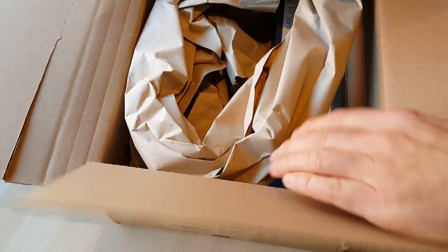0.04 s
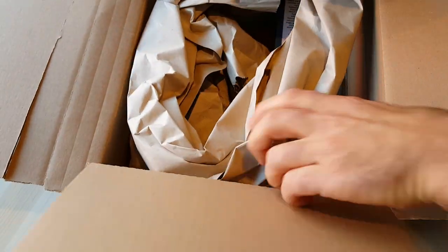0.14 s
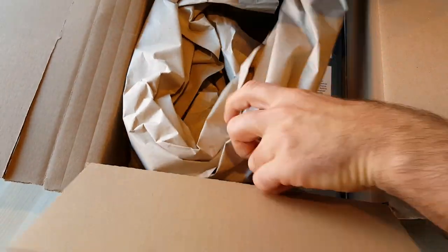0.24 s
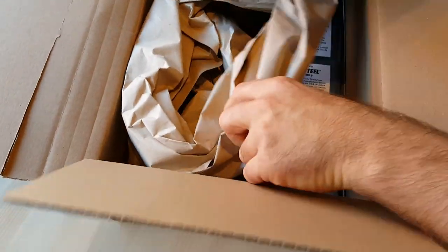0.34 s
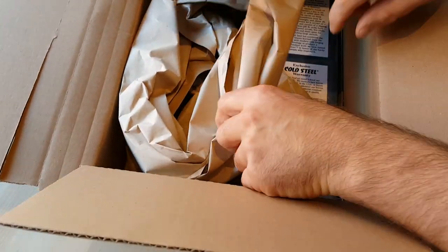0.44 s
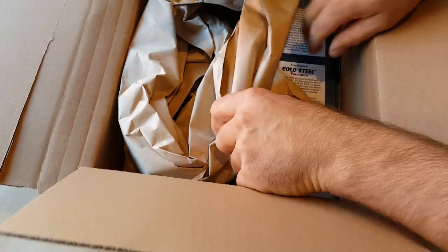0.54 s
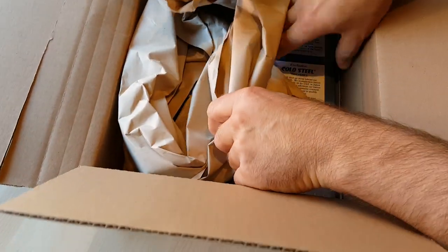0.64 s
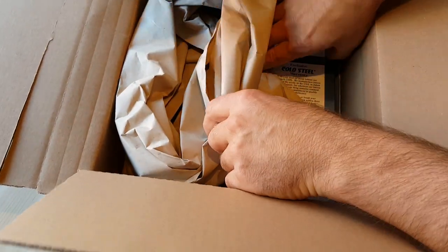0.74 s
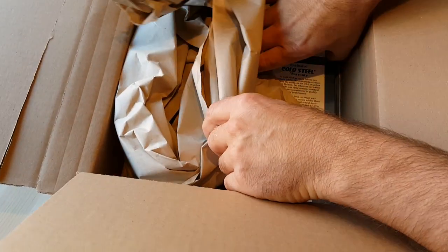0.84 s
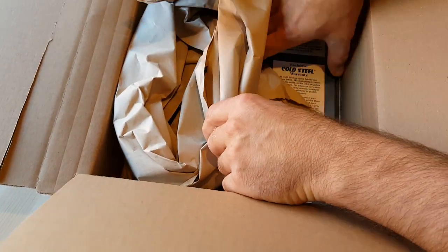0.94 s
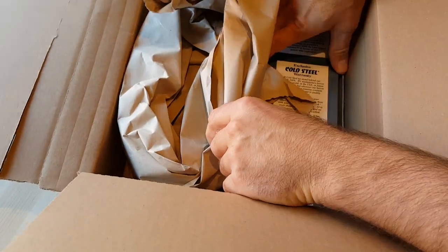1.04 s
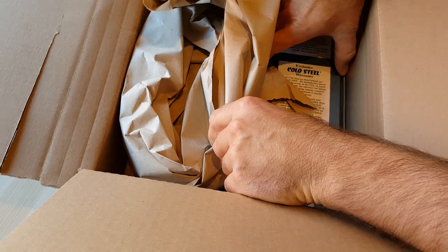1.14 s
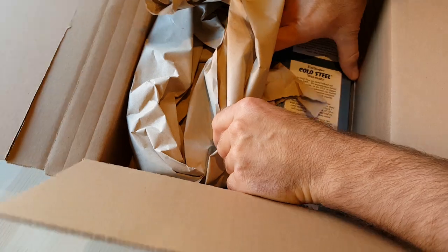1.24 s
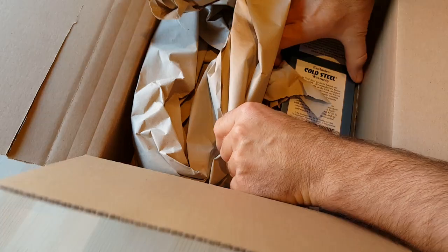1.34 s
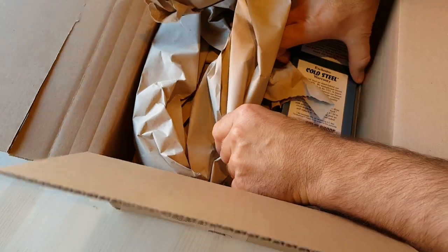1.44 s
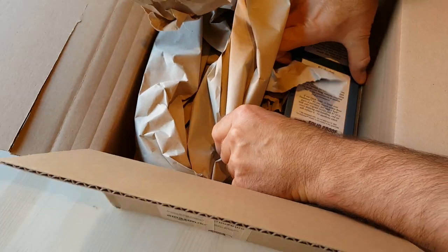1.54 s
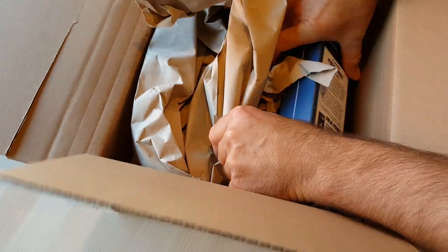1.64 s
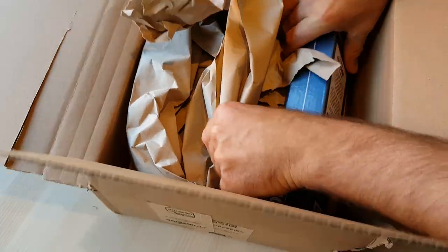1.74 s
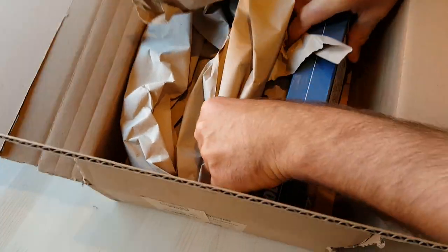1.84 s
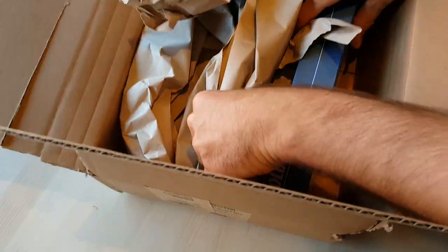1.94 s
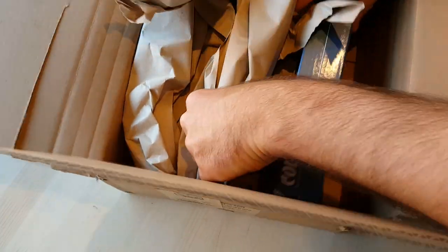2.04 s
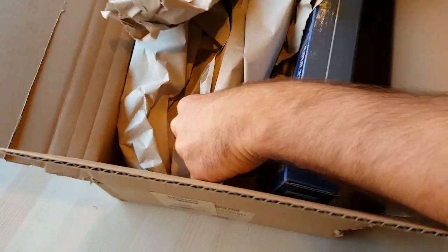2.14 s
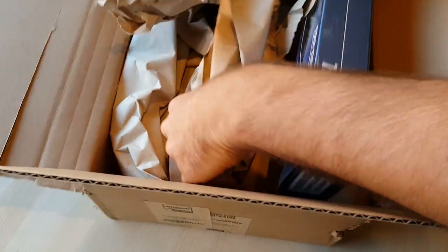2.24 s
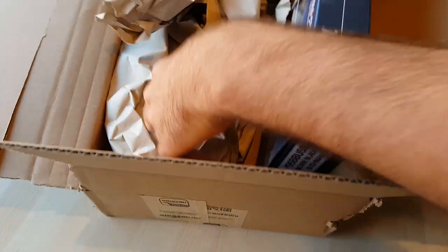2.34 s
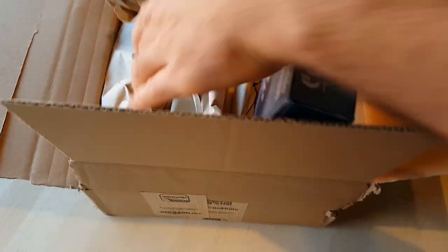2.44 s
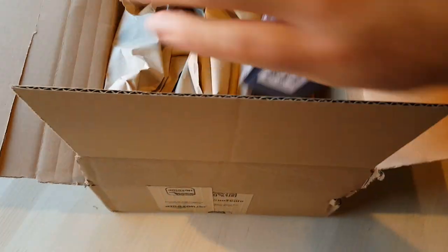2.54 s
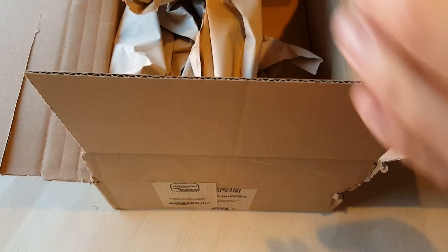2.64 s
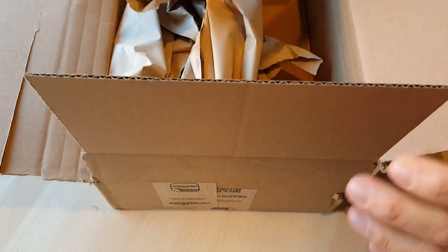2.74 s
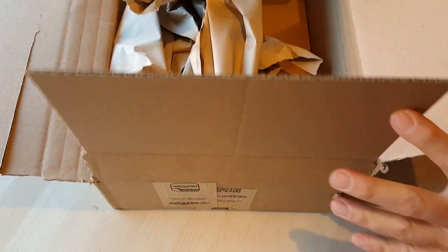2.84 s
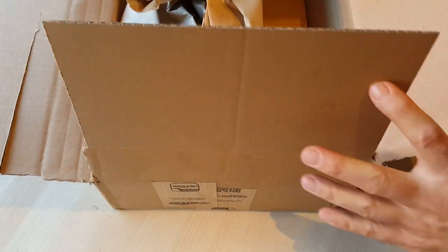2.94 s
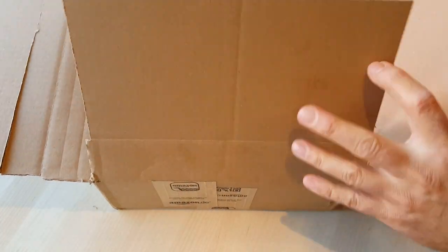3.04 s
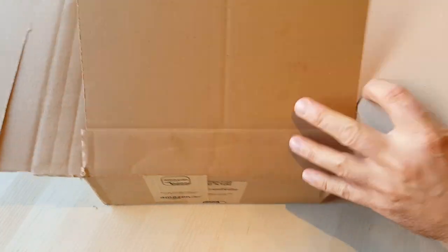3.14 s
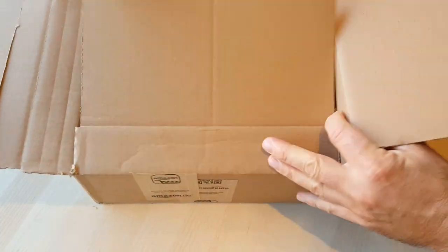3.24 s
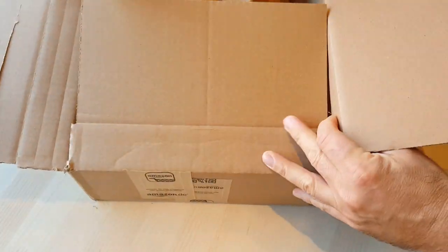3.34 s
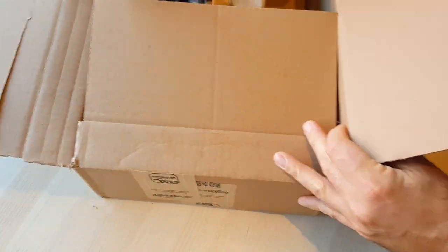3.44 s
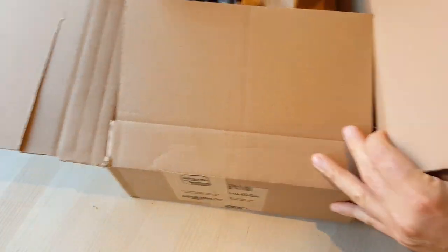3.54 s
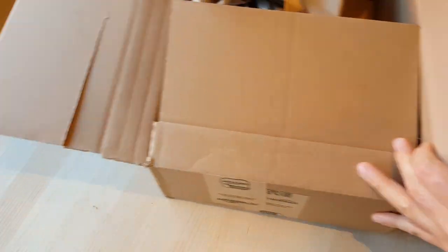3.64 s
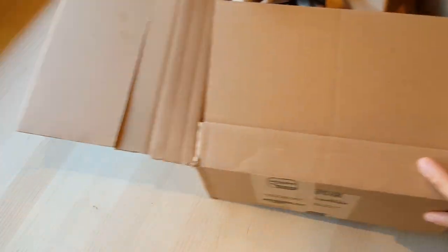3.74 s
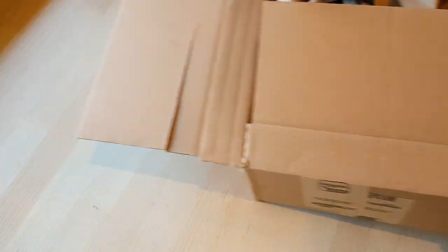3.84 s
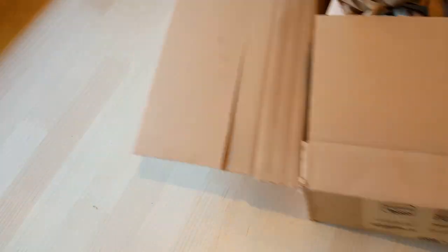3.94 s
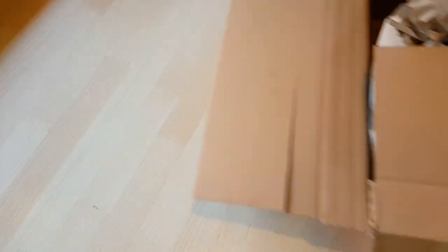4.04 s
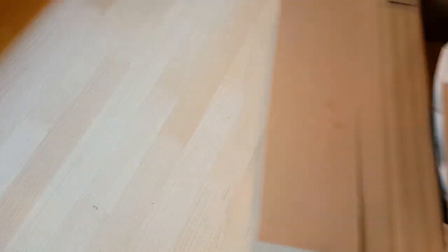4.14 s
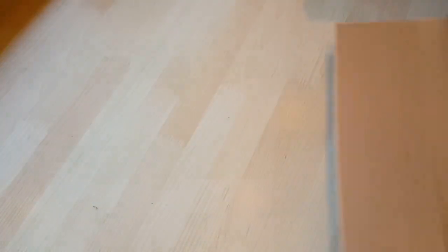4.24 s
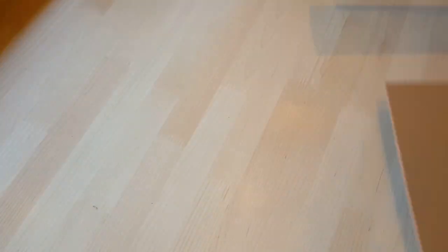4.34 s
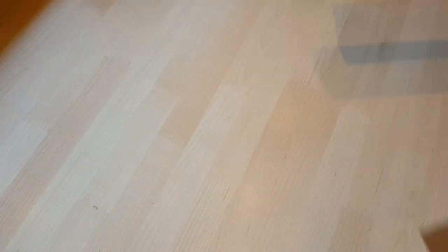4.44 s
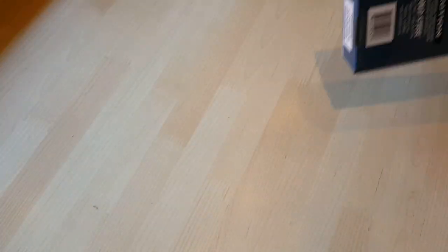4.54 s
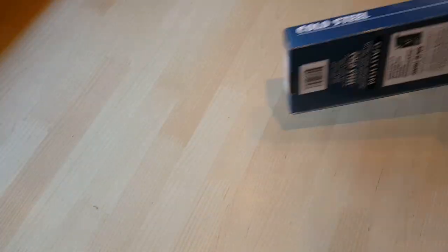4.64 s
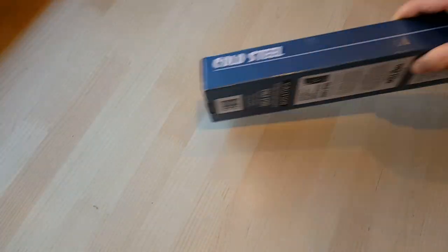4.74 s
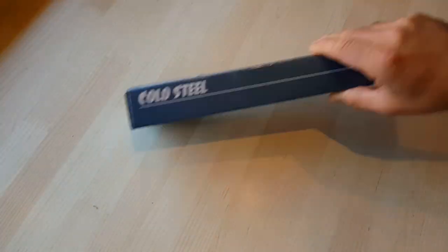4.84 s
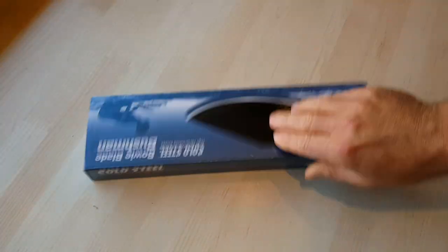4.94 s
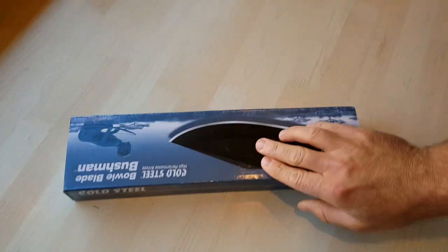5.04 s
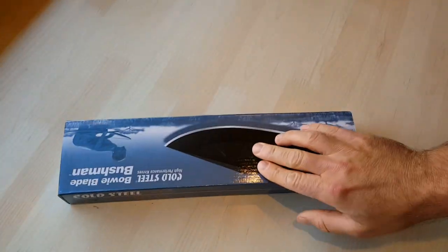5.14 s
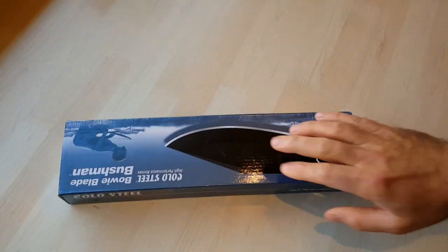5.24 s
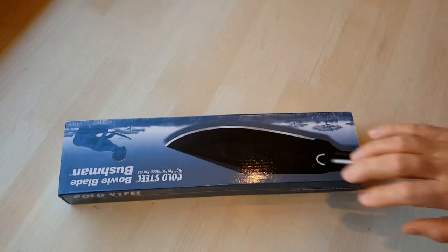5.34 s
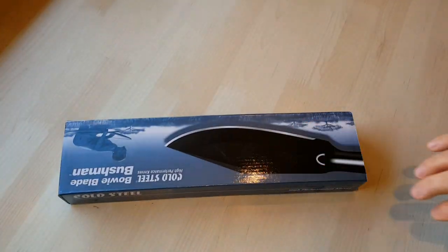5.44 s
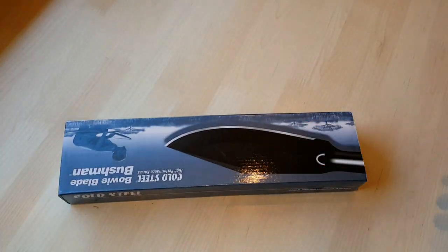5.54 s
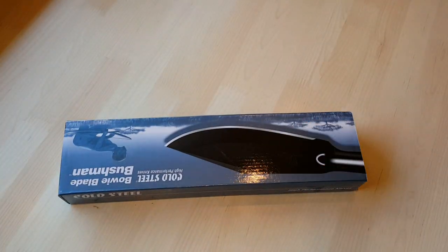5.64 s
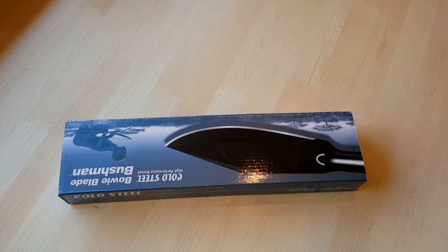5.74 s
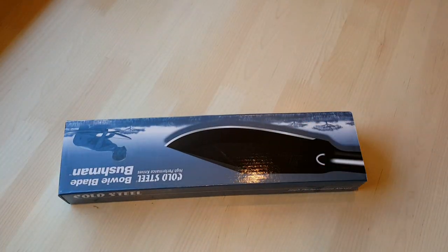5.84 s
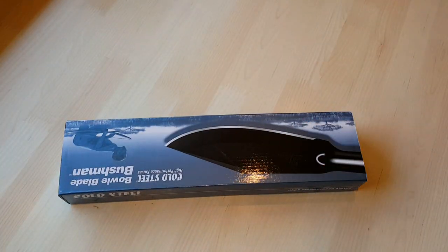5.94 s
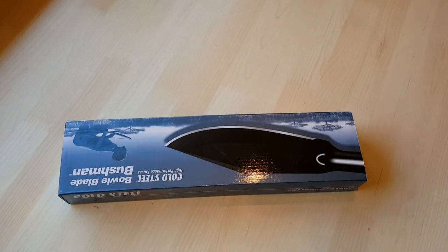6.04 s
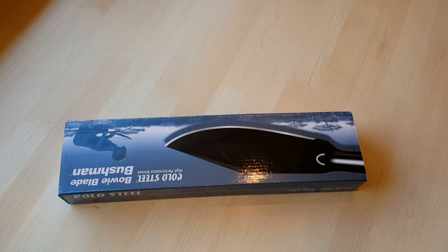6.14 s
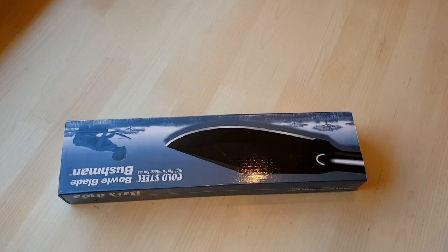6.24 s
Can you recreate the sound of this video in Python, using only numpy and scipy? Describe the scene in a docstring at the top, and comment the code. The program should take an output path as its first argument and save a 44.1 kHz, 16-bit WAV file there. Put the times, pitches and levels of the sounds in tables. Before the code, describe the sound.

A close stereo microphone in a small, quiet room with a short echo. From 0 to 2.7 seconds stiff packing paper rustles and crunches continuously, with irregular sharp snaps, strongest around 0.7, 0.9 and 2.3, and hollow low thumps on a cardboard carton, heaviest near 2.1. Around 2.5 the item judders along cardboard and gives a tiny rising squeak at 2.6; a flap clicks free at 2.8. From 2.9 to 3.5 the flap rubs dryly, with a catch and thump near 3.2. The carton slides softly, then scrapes and creaks on wood at 4.3, with dull bumps until 4.5. At 5.0 a boxed item lands with a loud woody knock, a quick slap and small bounces. Near silence follows, with faint skin brushes from 5.8, then a loud, dry cluster of jolts as the microphone stand shakes at 6.2, ringing low.

```python
"""Unpacking a boxed item

Hands dig a boxed item out of crumpled packing paper in a cardboard carton, fold back a flap and push the
carton across a wooden table; the item lands with a hard knock and the microphone stand is gripped and judders.
Rustling, rubbing and scraping are showers of tiny random clicks; snaps are short noise bursts. Blows are
fading sine waves with noise, and squeaks are sine waves of wavering pitch. All but the stand and the quiet
background noise get the echo of a small room. A close stereo microphone hears it."""
import sys
import numpy as np
from scipy import signal
from scipy.fft import rfft, irfft
from scipy.io import wavfile
from scipy.ndimage import uniform_filter1d

SR = 44100
rng = np.random.default_rng(int(sys.argv[2]) if len(sys.argv) > 2 else 0)


def transcribe(signal):
    """Save signal, clipped to [-1, 1], as a 16-bit WAV file at the path in sys.argv[1]."""
    frames = np.atleast_2d(signal).T
    limited = np.clip(frames, -1, 1)
    pcm = np.round(limited * 32767).astype(np.int16)
    wavfile.write(sys.argv[1], SR, pcm)


N = 276507
TIME = np.arange(N) / SR
RING = TIME[:SR * 3 // 4]  # time axis of one short sound, 0.75 s

# All levels are relative: the functions below add gains of their own. A t60 is the time to fade by 60 dB.
# The room's quiet noise. Each row: frequency in Hz, level in dB.
QUIET_COLOUR = [(15, -41), (25, -11), (134, -0.5), (185, -14.5), (301, -8.5), (384, -15), (714, -14.5),
                (1040, -19.5), (1190, -19), (1650, -25), (16000, -38.5)]
QUIET_DB = -61.5
# The hands keep the paper rustling, then let go. Each row: time in seconds, level in dB.
PAPER_HANDLING = [(0, -31.5), (0.11, -43), (0.17, -37), (0.35, -40.5), (0.49, -32), (0.53, -46),
                  (0.69, -33.5), (0.75, -32.5), (0.909, -43.5), (1.061, -35), (1.16, -39.5), (1.488, -40.5),
                  (1.8, -36.5), (2.04, -39.5), (2.24, -35), (2.46, -43), (2.63, -46.5), (2.74, -81)]
# Tone colour of the rustle. Each row: frequency in Hz, level in dB.
PAPER_COLOUR = [(29, -55), (50, -34.5), (111, -2), (155, 0), (208, -6.5), (337, 2.5), (439, -10.5),
                (842, -0.5), (950, -5.5), (1960, -4), (5400, -25), (9410, -25), (13200, -27.5),
                (16000, -31.5)]
# A wad of paper gives way. Each row: start in seconds, length in seconds, level in dB.
CRUNCHES = [(0.2, 0.21, -36), (0.31, 0.065, -36.5), (0.425, 0.074, -33), (1.25, 0.12, -35),
            (1.62, 0.13, -32), (2.08, .1, -35)]
# Tone colour of the crunches. Each row: frequency in Hz, level in dB.
CRUNCH_COLOUR = [(200, -15.5), (900, -1.5), (2200, -2), (3500, -10), (5400, -13.5), (9500, -11.5),
                 (16000, -25.5)]
# The loudest creases snap. Each row: time in seconds, level in dB, treble tilt in dB per octave.
SNAPS = [(0.225, -21, 9), (0.364, -17, -1.5), (0.414, -12, 3.5), (0.485, -17.5, 0.5), (0.611, -20.5, -6),
         (0.645, -19.5, 0), (0.705, -7.5, -2), (0.765, -14, -4.5), (0.827, -17.5, 2.5), (0.866, -9, -1.5),
         (0.873, -12, -1), (0.938, -13.5, 0.5), (0.964, -11.5, 0.5), (1.1545, -16, 3), (1.198, -17, -4.5),
         (1.374, -15.5, -1), (1.453, -24.5, -1), (1.529, -20, 1), (1.595, -13, -1.5), (1.752, -11, -4.5),
         (1.805, -13, -7), (1.98, -22, 0), (2.247, -18.5, 3), (2.328, -6.5, 1), (2.42, -20.5, -4)]
# Tone colour of a snap before its tilt. Each row: frequency in Hz, level in dB.
SNAP_COLOUR = [(100, -4.5), (400, 3), (900, -1), (1600, 0.5), (2400, -1), (4000, -10), (9500, -16.5),
               (16000, -28.5)]
# Blows on the carton. Each row: time in seconds, level in dB, pitch of the struck panel in Hz.
THUMPS = [(0.122, -24, 300), (0.168, -19.5, 158.5), (0.285, -25, 115), (0.402, -27.5, 290),
          (0.529, -25, 101), (0.563, -19, 121), (0.698, -14, 308), (0.799, -16.5, 159.4),
          (0.962, -12.5, 159), (1.749, -19.5, 109), (2.119, -10.5, 105), (2.119, -14, 242),
          (2.157, -9.5, 156), (2.307, -15, 103), (2.31, -14.5, 297), (2.325, -22, 322), (2.891, -28.5, 130),
          (3.191, -18.5, 219), (3.191, -20, 105), (3.2, -25, 335), (3.893, -35.5, 320), (3.945, -38, 130),
          (4.291, -28, 249), (4.351, -17, 296), (4.485, -17, 172), (4.502, -16.5, 123), (4.506, -21, 347)]
# Pitches at which the carton rings. Each row: frequency in Hz, level in dB, t60 in seconds.
CARTON_MODES = [(103, -24.5, .2), (156, 3.5, 0.19), (249.3, -2, 0.35), (306.4, -8, 0.35),
                (339.6, -10.5, 0.43), (515, -2, 0.18), (669, -2.5, .12), (843, -5, 0.16)]
# Tone colour of rubbed cardboard. Each row: frequency in Hz, level in dB.
CARTON_COLOUR = [(30, -33), (55, -8), (138, -1.5), (208, -9), (335, -0.5), (570, -14), (1100, -11.5),
                 (2200, -19), (3200, -21.5), (4600, -25.5), (6500, -19), (9500, -14.5), (14000, -17),
                 (16000, -26.5)]
# The item's smooth side hisses along the carton's wall. Each row: time in seconds, level in dB.
SLIDE = [(2.05, -59.5), (2.11, -37), (2.2, -61), (2.35, -44), (2.48, -59), (2.62, -47.5), (2.68, -63)]
# Cardboard sticks and slips on the item as it is drawn out. Each row: time in seconds, level in dB.
DRAW = [(2.47, -46), (2.52, -38.5), (2.56, -37), (2.63, -41), (2.66, -41), (2.69, -69)]
# Resonances that these slips drive. Each row: frequency in Hz, width in Hz, level in dB.
DRAW_PEAKS = [(130, 30, 4.5), (330, 59, -7), (514, 48, 0.5)]
# The item's corner squeaks as it leaves the flap. Each row: time in seconds, pitch in Hz, level in dB.
SQUEAK = [(2.6, 1467, -66), (2.626, 1745, -50), (2.64, 1974, -42), (2.665, 2220, -70)]
# A flap clicks free. Each row: time in seconds, level in dB, tilt in dB per octave.
FLICK = [(2.776, -21.5, -3.5), (2.7785, -25, 2)]
# The flap's short ring. Each row: frequency in Hz, level in dB, t60 in seconds.
FLAP_MODES = [(1240, 6, 0.072), (1410, -42, .04), (1710, 17, 0.021), (2390, 7, .03), (2760, -8, 0.033)]
# Tone colour of the flap's click. Each row: frequency in Hz, level in dB.
FLAP_COLOUR = [(200, -22), (700, -15), (1400, 2), (1850, 4.5), (2200, -6), (2700, 4), (3900, -16.5),
               (4700, -13), (9000, -24.5), (16000, -43)]
# Edges of card, and fingertips, catch and let go.
# Each row: time in seconds, level in dB, treble tilt in dB per octave, t60 in seconds.
CATCHES = [(2.891, -37, 0.5, 0.11), (3.161, -12.5, -3, 0.17), (3.183, -23, 9.5, .06),
           (3.303, -23, -10, 0.096), (3.418, -27, 8.5, .04), (3.464, -25, -11, 0.053),
           (3.711, -32, 9, 0.096), (3.943, -32, -12, 0.096), (4.045, -33.5, -21.5, 0.08),
           (4.289, -25, -9, .05), (4.502, -36, 11, 0.25), (4.907, -28.5, -13.5, 0.058),
           (5.515, -43, -19, .09), (6.136, -36, -0.5, .08)]
# The flap is folded back, rubbing on its neighbour.
# Each row: time in seconds, level in dB, level of the hiss in dB.
FOLD = [(2.945, -46.5, -51), (3.015, -43, -47.5), (3.06, -39, -38.5), (3.14, -37.5, -43),
        (3.18, -35, -37.5), (3.3, -33.5, -40), (3.35, -44.5, -51), (3.48, -43, -52), (3.56, -55, -57)]
# The carton is pushed across the table. Each row: time in seconds, level in dB, level of the hiss in dB.
PUSH = [(3.56, -50, -52), (3.67, -50.5, -50.5), (3.8, -50.5, -52.5), (3.92, -59, -48.5),
        (4.02, -61.5, -55.5), (4.17, -49.5, -49.5), (4.3, -45, -50), (4.45, -47, -51), (4.51, -44, -48),
        (4.62, -59.5, -66), (4.7, -71.5, -66)]
# The carton's bottom sticks and slips on the wood. Each row: time in seconds, level in dB.
SCRAPE = [(4.18, -43), (4.28, -34.5), (4.29, -29.5), (4.32, -26), (4.334, -20.5), (4.356, -26.5),
          (4.375, -45), (4.44, -43.5), (4.47, -53.5)]
# Resonances that the scrape drives. Each row: frequency in Hz, width in Hz, level in dB.
SCRAPE_PEAKS = [(190, 70, 2), (278, 33, 5.5), (402, 89, -11), (547, 60, -13.5), (990, 90, 6),
                (1342, 65, -6.5), (1845, 88, -16)]
# The carton creaks at the hardest push. Each row: time in seconds, pitch in Hz, level in dB.
CREAK = [(4.305, 932, -49), (4.333, 990, -38), (4.35, 1020, -48), (4.375, 1070, -57)]
# Skin brushes the item and the stand. Each row: start in seconds, length in seconds, level in dB.
BRUSHES = [(4.82, 0.3, -60), (5.5, 0.2, -68), (5.835, 0.051, -58), (5.85, 0.33, -48), (6.135, 0.16, -50)]
# The item lands edge first, slaps flat and bounces. Each row: time in seconds, level in dB, tilt in dB per octave.
LANDING = [(5.005, -5.5, -4), (5.0115, -0.5, 0), (5.0145, -2, -1), (5.03, -13.5, 0), (5.048, -10, -1.5)]
# The item ringing on the wooden table. Each row: frequency in Hz, level in dB, t60 in seconds.
TABLE_MODES = [(52, -18.5, 0.57), (134, 2.5, 0.25), (156, 2, .2), (334, 1, .26), (467, 10, .14),
               (522, 14.5, .19), (582, 13, 0.12), (694, -12.5, 0.46), (1087, -11.5, 0.44),
               (1410, -4.5, .25), (1520, 0.5, 0.2), (2000, -11, .3), (2010, -17.5, 0.19),
               (2304, -14.5, 0.46), (2476, -9, 0.29), (2710, -16, .25), (2800, -13, .2), (3394, -24, 0.2)]
# Contact noise of the landing. Each row: frequency in Hz, level in dB.
LANDING_COLOUR = [(35, -8.5), (90, -5), (130, -3.5), (220, -2), (400, -4.5), (540, 5.5), (800, -8),
                  (1450, -10), (2300, -6.5), (3800, -27.5), (6200, -30.5), (9000, -37), (16000, -46)]
# The stand jolts. Each row: time in seconds, level in dB, tilt in dB per octave.
JOLTS = [(6.194, -6.5, 0.5), (6.1975, 1, -2.5), (6.2215, -2.5, 1.5), (6.238, -1.5, 0), (6.252, -6, -2.5),
         (6.266, -17, -8)]
# The microphone stand's ring. Each row: frequency in Hz, level in dB, t60 in seconds.
STAND_MODES = [(142.7, -17, 1), (280, -1.5, 0.037), (338.7, 0, 0.26), (428, -8, 0.14), (497, -7, 0.07),
               (650, -13, 0.18), (853, -25, .1), (883, -13, 0.21), (1107, -16.5, 0.091), (1900, -25, 0.23)]
# Contact noise of the stand. Each row: frequency in Hz, level in dB.
STAND_COLOUR = [(40, -27), (150, -10), (350, 1), (800, -13.5), (1400, -20), (2500, -30), (5000, -37),
                (16000, -47)]
# How fast the room's echo fades. Each row: frequency in Hz, t60 in seconds.
ROOM_T60 = [(60, 0.65), (250, 0.26), (700, 0.33), (2200, 0.45), (5000, 0.39), (14000, 0.12)]
# Stereo width of diffuse sound. Each row: frequency in Hz, side minus mid level in dB.
WIDTH = [(60, -17), (150, -13), (280, -10), (500, -5.5), (1000, -1.3), (2000, -2.5), (4000, -.2),
         (16000, -.2)]

STROKE_RISE = 0.2  # share of a crunch or a brush spent swelling
PAPER_SMOOTH_DB = -6  # smooth hiss under the paper's clicks
# a crease's t60 at no tilt, and the tilt in dB per octave that halves it: small folds are bright and brief
SNAP_T60_S, SNAP_HALVING_DB = 0.038, 5
CRACK_DB, CRACK_T60_S = 2, 0.006  # sharp start of a snap: level above its chatter, and decay
# decay of a panel at that pitch; power by which higher panels die sooner
PANEL_T60_S, PANEL_HZ, PANEL_DAMPING = 0.11, 150, 0.35
TOP_HZ = 16000  # highest frequency the recorder keeps


def undb(db):
    """Turn decibels into a plain multiplier."""
    return 10 ** (np.asarray(db) / 20)


def unit(x):
    """Scale to an average (rms) level of one."""
    return x / np.sqrt(np.mean(x ** 2))


def fade(t60):
    """Exponential decay that loses 60 dB in t60 seconds."""
    return np.exp(-np.log(1000) * RING / t60)


def read(points, hz):
    """Read an (Hz, value) table, spacing frequencies by octaves."""
    table_hz, value = np.transpose(points)
    return np.interp(np.log(np.maximum(hz, 1)), np.log(table_hz), value)


def through(x, response):
    """Pass a sound through a filter's response, keeping the length."""
    return signal.fftconvolve(np.atleast_2d(x), np.atleast_2d(response), axes=-1)[:, :x.shape[-1]]


def colour(x, points, size=4096):
    """Filter with an (Hz, dB) curve, reacting at once and keeping the power of white noise."""
    log_gain = np.log(undb(read(points, np.fft.rfftfreq(size, 1 / SR))))
    # folding the cepstrum forward in time makes the response start without delay
    cepstrum = irfft(log_gain)
    cepstrum[1:size // 2] *= 2
    cepstrum[size // 2 + 1:] = 0
    response = irfft(np.exp(rfft(cepstrum)))
    return through(x, response / np.linalg.norm(response))


def band(x, hz, kind):
    """Steep low-, band- or high-pass."""
    return signal.sosfilt(signal.butter(4, hz, kind, fs=SR, output="sos"), x)


def ports(pair):
    """Two close microphone ports hear long waves alike and short ones differently."""
    mid, side = pair
    width = undb(read(WIDTH, np.fft.rfftfreq(len(side), 1 / SR)))
    side = irfft(rfft(side) * width, len(side))
    return np.array([mid + side, mid - side]) / np.sqrt(2)


def noise(size):
    """Diffuse white noise at the two ports."""
    return ports(rng.standard_normal((2, size)))


def add(out, s, sound):
    """Mix a sound in at time s."""
    start = int(np.clip(s * SR, 0, N - 1))
    out[:, start:start + sound.shape[-1]] += sound[..., :N - start]


def gains(curve):
    """Gain over time for each level column of a curve; silent outside it."""
    s, *columns = np.transpose(curve)
    touching = uniform_filter1d(1. * ((TIME > s[0] - 0.01) & (TIME < s[-1])), 600)
    return [undb(np.interp(TIME, s, db)) * touching for db in columns]


def strokes(rows):
    """Gain over time of short strokes that swell quickly and ease off."""
    total = np.zeros(N)
    for s, length, db in rows:
        swell = np.interp((TIME - s) / length, [0, STROKE_RISE, 1], [0, 1, 0])
        total += undb(db) * np.sin(np.pi / 2 * swell) ** 2
    return total


def walk(rate):
    """Smoothly wandering random values, with a new target rate times a second and an rms of one."""
    hold = max(int(SR / rate), 2)
    steps = rng.standard_normal(N)[np.arange(N) // hold]
    return unit(uniform_filter1d(uniform_filter1d(steps, hold), hold))


def grains(rate, spread_db):
    """Random tiny clicks, rate a second, most weak and a few strong, each with its own stereo place."""
    when, chance, turn = rng.random((int(rate * N / SR), 3)).T
    size = undb(spread_db * np.minimum(-np.log(1 - chance), 4))
    angle = 2 * np.pi * turn
    clicks = np.zeros((2, N))
    clicks[:, (when * N).astype(int)] = size * np.array([np.cos(angle), np.sin(angle)])
    return unit(clicks)


def scatter(t60, size=4096):
    """Smear a click briefly without colouring it: every frequency keeps its level but shifts in time."""
    phase = np.angle(rfft(rng.standard_normal(size) * fade(t60)[:size]))
    return np.roll(irfft(np.exp(1j * phase)), size // 8)


def rub(force, hiss, rumble, spectrum, rate, spread_db, smooth_db, mid_db, hiss_db, rumble_db, jerk_db,
        scatter_t60):
    """Fibres and folds let go in tiny clicks over a smooth hiss; the panels behind them rumble."""
    # small folds tick high and large ones low, so each range has its own clicks beside the shared ones
    shared = grains(rate, spread_db)
    ranges = [(30, 500), (500, 1200), (1200, 2400), (2400, 4500), (4500, 9000), (9000, 17000)]  # Hz
    clicks = sum(band(0.6 * shared + grains(rate / 2, spread_db), edges, "band") for edges in ranges)
    # each click bounces among the folds and the carton's walls
    bounced = unit(through(clicks, scatter(scatter_t60)))
    smooth = undb(smooth_db) * rng.standard_normal((2, N))
    x = colour(ports(bounced + smooth), spectrum)
    low = rumble * undb(rumble_db) * unit(band(x, 500, "low"))
    mid = force * undb(mid_db) * unit(band(x, [500, 4500], "band"))
    high = hiss * undb(hiss_db) * unit(band(x, 4500, "high"))
    return (low + mid + high) * undb(jerk_db * walk(rate=70))


def snaps(rows, gain_db):
    """A crease buckles or an edge slips with a sharp crack, and the sheet round it chatters briefly."""
    out = np.zeros((2, N))
    for s, db, tilt_db, t60 in rows:
        pan_db = 1 - 2 * rng.standard_normal()  # left minus right
        burst = noise(len(RING)) * (fade(t60) + undb(CRACK_DB) * fade(CRACK_T60_S)) / 2
        # the tilt starts at 1 kHz
        tilted = [(hz, level + tilt_db * np.log2(max(hz, 1000) / 1000)) for hz, level in SNAP_COLOUR]
        sides_db = np.array([[pan_db], [-pan_db]]) / 2
        add(out, s, colour(burst, tilted) * undb(gain_db + db + sides_db))
    return out


def quiet_noise():
    """The room's steady background: coloured noise."""
    return undb(QUIET_DB) * unit(colour(noise(N), QUIET_COLOUR))


def crinkles(force, gain_db, spread_db=5, centre_hz=1900, octaves=0.854, cycles=22, count=150):
    """Single facets of the paper pop over, each with a short ring at its own pitch."""
    out = np.zeros((2, N))
    t = RING[:1500]
    times = rng.uniform(0, PAPER_HANDLING[-1][0], count)
    for when, pitch, size, lag in zip(times, *rng.standard_normal((count, 3)).T):
        hz = np.clip(centre_hz * 2 ** (octaves * pitch), 400, 12000)
        phase = np.array([[0], [lag * hz / 1500]])  # the two ports hear it slightly apart
        pop = np.sin(2 * np.pi * hz * t + phase) * np.exp(-np.log(1000) * hz * t / cycles)
        level = undb(gain_db + spread_db * np.clip(size, -1.5, 1.5))
        add(out, when, np.interp(when, TIME, force) * level * pop)
    return out


def creases(force, count=14, small_db=6, spread_db=2, tilt_spread_db=3):
    """The loud snaps, and small chance ones that follow the handling: rows (s, dB, tilt, t60)."""
    times = PAPER_HANDLING[-1][0] * (np.arange(count) + rng.random(count)) / count
    rows = list(SNAPS)
    for s, (size, tilt) in zip(times, rng.standard_normal((count, 2))):
        force_db = 20 * np.log10(np.interp(s, TIME, force) + 1e-9)
        rows.append((s, force_db + small_db + spread_db * size, tilt_spread_db * tilt))
    return [(s, db, tilt_db, SNAP_T60_S * 2 ** (-tilt_db / SNAP_HALVING_DB)) for s, db, tilt_db in rows]


def paper():
    """Handling rustles the paper and rumbles the carton; wads crunch; facets and creases pop with both."""
    handling, = gains(PAPER_HANDLING)
    crunch = strokes(CRUNCHES)
    rustle = rub(handling, handling, handling, PAPER_COLOUR, rate=650, spread_db=5,
                 smooth_db=PAPER_SMOOTH_DB, mid_db=-1, hiss_db=-4.5, rumble_db=-4.5, jerk_db=2.5,
                 scatter_t60=0.028)
    wads = rub(crunch, crunch, crunch, CRUNCH_COLOUR, rate=900, spread_db=1,
               smooth_db=PAPER_SMOOTH_DB, mid_db=3, hiss_db=-3.5, rumble_db=-2, jerk_db=2.6,
               scatter_t60=0.025)
    force = np.hypot(handling, crunch)
    return rustle + wads + crinkles(force, gain_db=1.5) + snaps(creases(force), gain_db=1)


def ring(modes):
    """Free ringing of a set of modes: fading sine waves with alternating sign."""
    return sum((-1) ** k * undb(db) * np.sin(2 * np.pi * hz * RING) * fade(t60)
               for k, (hz, db, t60) in enumerate(modes))


def thumps(body_db=-9, buzz_db=-13, buzz_t60=0.1):
    """A struck panel swings for a few cycles and sets the whole carton ringing and buzzing."""
    out = np.zeros((2, N))
    for s, db, hz in THUMPS:
        panel = np.sin(2 * np.pi * hz * RING) * fade(PANEL_T60_S * (PANEL_HZ / hz) ** PANEL_DAMPING)
        # modes far from the panel's pitch ring less, by 7 dB per octave
        body = ring([(f, level - 7 * abs(np.log2(f / hz)), t60) for f, level, t60 in CARTON_MODES])
        buzz = colour(noise(len(RING)) * fade(buzz_t60), [(30, -10), (hz, 0), (700, -7), (3000, -32)])
        add(out, s, undb(db) * (panel + undb(body_db) * body + undb(buzz_db) * buzz))
    return band(out, 48, "high")


def scrape(curve, peaks, rate, harden):
    """Uneven slips drive hollow resonances; the high part needs the hardest pushes."""
    s, db = np.transpose(curve)
    force_db = np.interp(TIME, s, db, left=-120, right=-120) - db.max()
    body = sum(width * undb(level) * np.cos(2 * np.pi * hz * RING) * np.exp(-np.pi * width * RING)
               for hz, width, level in peaks)
    slips = unit(band(through(ports(grains(rate, spread_db=3)), body), 1300, "low"))
    low = band(slips, 680, "low") * undb(force_db)
    high = band(slips, 830, "high") * undb(force_db * harden)
    return undb(db.max()) * (low + high)


def squeak(curve, waver):
    """A rough, rising stick-slip tone: a sine wave whose pitch wavers fast."""
    s, hz, db = np.transpose(curve)
    pitch = np.interp(TIME, s, hz) * (1 + waver * walk(rate=2100))
    tone = np.sqrt(2) * np.sin(2 * np.pi * np.cumsum(pitch) / SR)
    return tone * undb(np.interp(TIME, s, db, left=-140, right=-140))


def drawing_out():
    """The item hisses along the wall, judders, and squeaks as it comes free."""
    slide, = gains(SLIDE)
    hiss = rub(slide, slide, slide, CARTON_COLOUR, rate=980, spread_db=1, smooth_db=-0.5, mid_db=5,
               hiss_db=3, rumble_db=0, jerk_db=-2.2, scatter_t60=0.013)
    return hiss + scrape(DRAW, DRAW_PEAKS, rate=540, harden=3.4) + squeak(SQUEAK, waver=0.017)


def knocks(blows, modes, spectrum, ring_db, contact_db, contact_t60, rattle_db, rattle_t60):
    """Each blow rings the same modes, with contact noise and a longer rattle; its tilt sets how bright."""
    out = np.zeros((2, N))
    for s, db, tilt_db in blows:
        body = ring([(hz, level + tilt_db * np.log2(hz / 500), t60) for hz, level, t60 in modes])
        envelope = undb(contact_db) * fade(contact_t60) + undb(rattle_db) * fade(rattle_t60)
        tilted = [(hz, level + tilt_db * np.log2(hz)) for hz, level in spectrum]
        contact = colour(noise(len(RING)) * envelope, tilted)
        add(out, s, undb(db) * (undb(ring_db) * body + contact))
    return out


def flap_click():
    """The flap clicks free: mostly contact noise, with a short ring."""
    return knocks(FLICK, FLAP_MODES, FLAP_COLOUR, ring_db=-21, contact_db=-4, contact_t60=0.0064,
                  rattle_db=-8, rattle_t60=0.074)


def cardboard():
    """The flap rubs as it folds, then the carton slides; edges and fingertips catch and let go."""
    force, hiss = gains(FOLD)
    fold = rub(force, hiss, force, CARTON_COLOUR, rate=2200, spread_db=3.5, smooth_db=0, mid_db=1,
               hiss_db=0.5, rumble_db=-5.5, jerk_db=2.35, scatter_t60=0.021)
    force, hiss = gains(PUSH)
    push = rub(force, hiss, force, CARTON_COLOUR, rate=680, spread_db=5.5, smooth_db=0.5, mid_db=0,
               hiss_db=-4.5, rumble_db=4, jerk_db=-2.5, scatter_t60=0.029)
    return fold + push + snaps(CATCHES, gain_db=0)


def carton_on_wood():
    """The carton's bottom sticks and slips on the table, and creaks at the hardest push."""
    return scrape(SCRAPE, SCRAPE_PEAKS, rate=1100, harden=1.6) + squeak(CREAK, waver=0.1)


def skin_brushes():
    """Skin rubs softly over the item and the stand: clicks under a stronger smooth hiss."""
    skin = strokes(BRUSHES)
    return rub(skin, skin, skin, CARTON_COLOUR, rate=1800, spread_db=5.5, smooth_db=4.5, mid_db=1,
               hiss_db=-7, rumble_db=2.5, jerk_db=0.5, scatter_t60=0.0096)


def item_landing():
    """The item knocks on the table and both ring."""
    return knocks(LANDING, TABLE_MODES, LANDING_COLOUR, ring_db=-30.5, contact_db=0, contact_t60=0.021,
                  rattle_db=-24, rattle_t60=0.13)


def stand_jolts():
    """The stand shakes the microphone directly, its right side a little more."""
    stand = knocks(JOLTS, STAND_MODES, STAND_COLOUR, ring_db=-8.5, contact_db=-36, contact_t60=0.033,
                   rattle_db=-12.5, rattle_t60=0.41)
    return stand * undb(np.array([[-1], [1]]))


def tail():
    """A diffuse echo that dies soonest in the treble: noise faded octave by octave."""
    hz = np.fft.rfftfreq(len(RING), 1 / SR)
    octave = np.log2(np.clip(hz, 62.5, 16000) / 62.5)
    spectrum = rfft(noise(len(RING)))
    echo = 0
    for k in range(9):
        share = np.maximum(1 - abs(octave - k), 0)  # overlapping bands that add up to one
        echo = echo + irfft(spectrum * share, len(RING)) * fade(read(ROOM_T60, 62.5 * 2 ** k))
    echo = echo * (1 - fade(0.0094))  # builds up gently
    return echo / np.linalg.norm(echo[0])


def room(x, wet_db, count=1):
    """Add the room; a source that moves about meets count different echoes in turn."""
    mono, out = x.sum(axis=0) / np.sqrt(2), x
    place = (TIME * 7).astype(int) % count  # seven places a second
    for k in range(count):
        here = uniform_filter1d(1. * (place == k), 200)
        out = out + undb(wet_db) * through(mono * here, tail())
    return out


def scene():
    """Paper, carton and item in the room; the stand's jolts and the quiet noise get no added echo."""
    unpacking = paper() + thumps() + drawing_out() + flap_click()
    unpacking = unpacking + cardboard() + carton_on_wood() + skin_brushes()
    item = room(item_landing(), wet_db=-2.5)
    return quiet_noise() + room(unpacking, wet_db=-10, count=4) + item + stand_jolts()


def record(dry):
    """The microphone thins the deepest bass; the recorder rounds off at full scale and cuts the top."""
    x = signal.sosfilt(signal.butter(2, 30, "high", fs=SR, output="sos"), dry)
    x = x / (1 + x ** 8) ** (1 / 8)
    return signal.sosfilt(signal.ellip(10, 0.2, 80, TOP_HZ, fs=SR, output="sos"), x)


dry = scene()
out = record(dry)
transcribe(out)
```